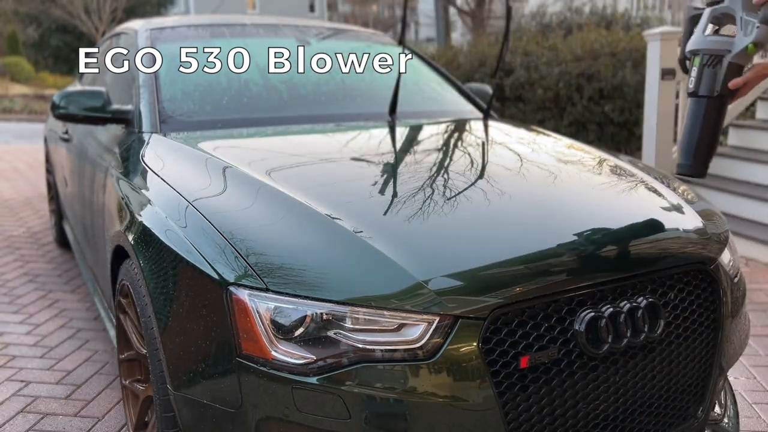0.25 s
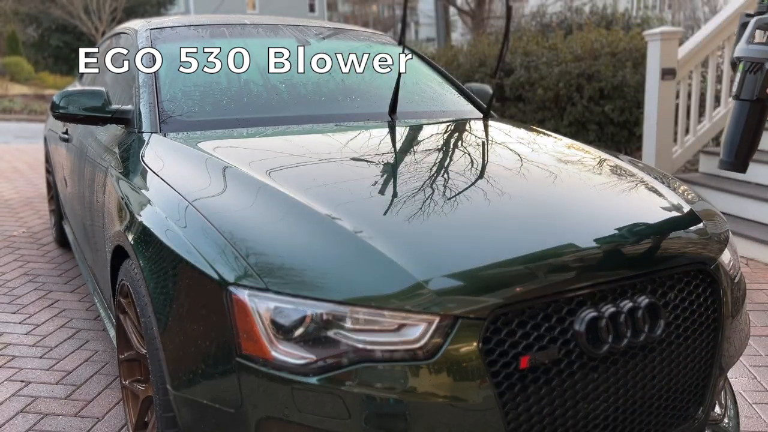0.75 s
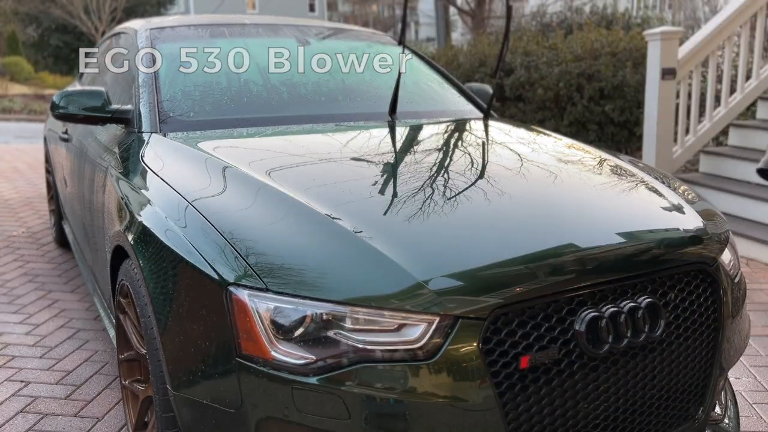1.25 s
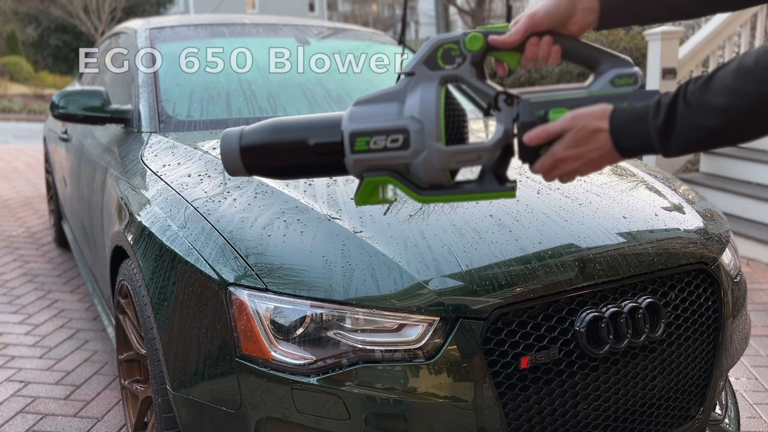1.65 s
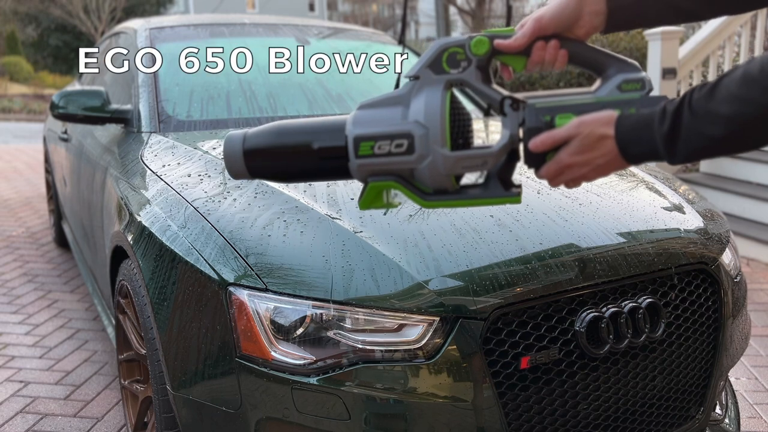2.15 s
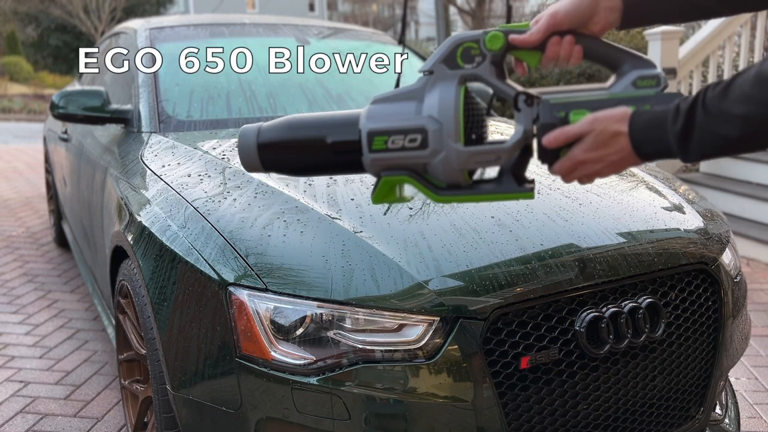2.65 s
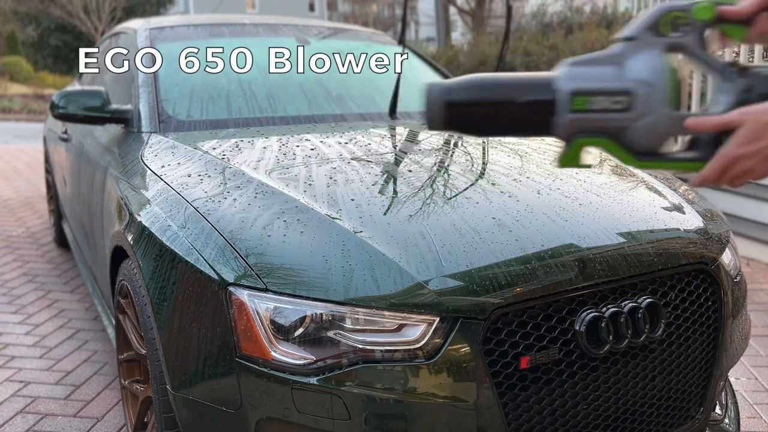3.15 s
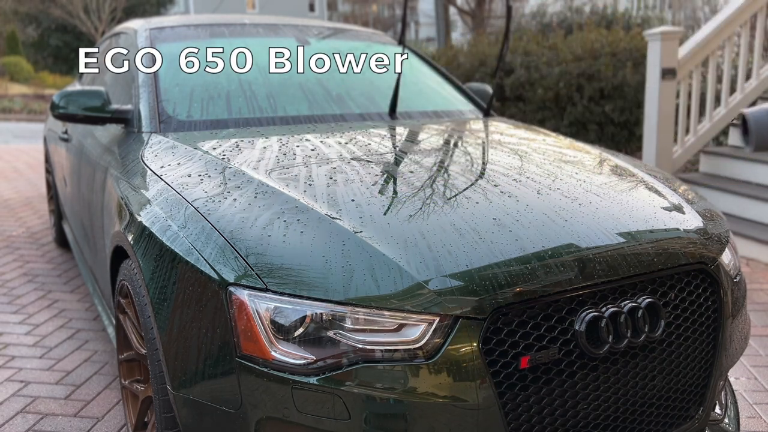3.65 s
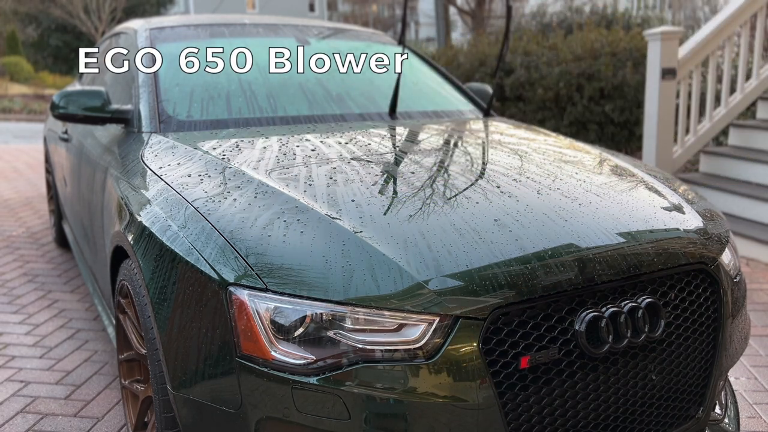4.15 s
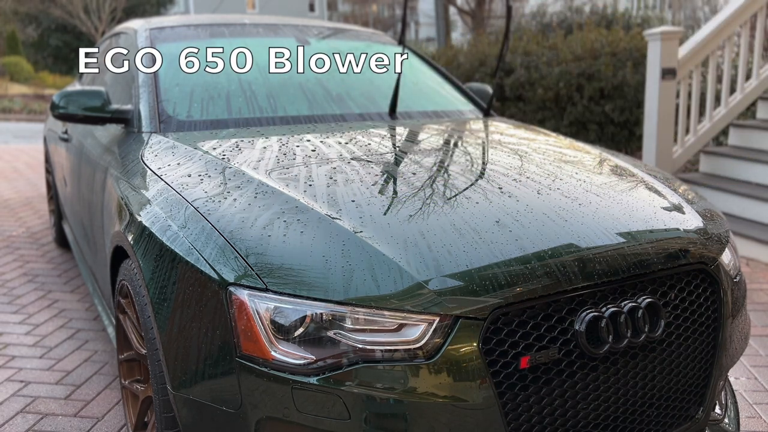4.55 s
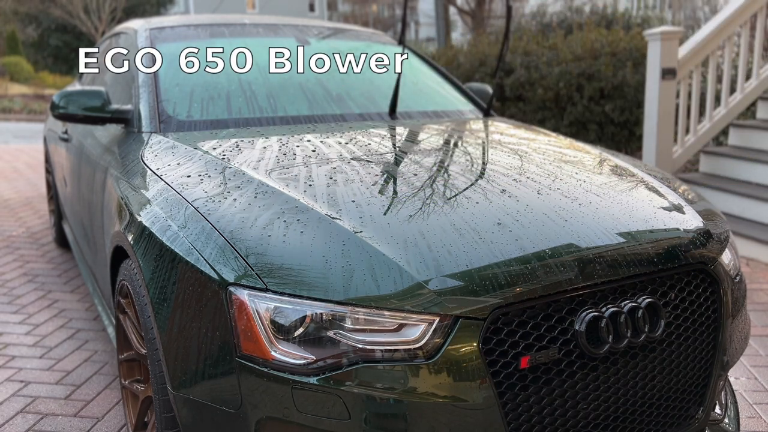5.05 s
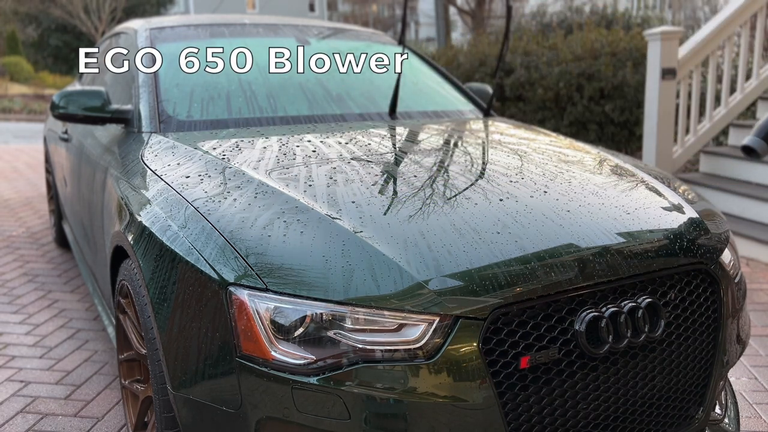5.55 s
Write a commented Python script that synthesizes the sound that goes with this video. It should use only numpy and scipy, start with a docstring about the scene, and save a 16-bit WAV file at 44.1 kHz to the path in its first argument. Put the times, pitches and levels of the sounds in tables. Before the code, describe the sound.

From the start, a battery leaf blower runs at full speed close to the microphone outdoors: a steady hiss of air, a fuzzy high whistle, a thin motor whine and low buffeting gusts. At about 1.2 seconds its pitch begins to fall, and at 1.5 seconds it cuts off abruptly. A near-silent lull follows, with only a very faint low wash of far traffic. Between about 3 and 4.8 seconds come a few tiny plastic clicks and soft sleeve rustles. Around 4 seconds a distant bird gives one faint rising call with a short echo. At about 4.9 seconds a second blower starts close by with a brief buzz and spins up quickly, its whine rising as the rush of air swells. By 5.5 seconds it reaches a higher pitch than the first, and it keeps blowing until the end, near 5.8 seconds.

```python
"""Two battery leaf blowers on a driveway, close to a stereo microphone. The first blows steadily and begins to
slow; its sound stops abruptly. The lull opens onto the yard: far traffic, faint handling nearby, one distant
rising bird call. Then the second starts with a buzz and spins up. Each blower is a hissing jet, low buffeting
at the nozzle, a fuzzy whistle from the fan's blade tips and thin motor lines, all following the shaft speed."""
import sys
import numpy as np
from scipy import signal
from scipy.fft import rfft, irfft
from scipy.io import wavfile
from scipy.ndimage import uniform_filter1d

SR = 44100
rng = np.random.default_rng(int(sys.argv[2]) if len(sys.argv) > 2 else 0)


def unload_wav(signal):
    """Save mono or channel-first audio to the path in sys.argv[1] as 16-bit WAV at rate SR, clipped to [-1, 1]."""
    wavfile.write(
        sys.argv[1],
        SR,
        np.round(np.clip(np.atleast_2d(signal).T, -1, 1) * 32767).astype(np.int16),
    )


N = 255780
T = np.arange(N) / SR
HZ = np.fft.rfftfreq(N, 1 / SR)

# Stereo image of the noise. Each row: frequency in Hz, left-right likeness 0-1, right lead in radians.
STEREO_IMAGE = [(60, 1, .02), (171, 1, 0.4), (359, .86, 0.98), (720, .55, 1.5), (1051, 0.7, 1.6),
                (1330, .72, 2.2), (1900, 0.6, 1), (2410, 0.2, 2.2), (3002, .12, 1.8), (3180, .18, 3),
                (3600, 0.4, 3.1), (4470, .25, 1.9), (5100, 0, 1.6), (5700, 0.3, 2.504), (6200, .05, 2.5),
                (6550, 0.1, .1), (7190, .45, .8), (8210, 0.8, 2.1), (9200, 0.7, 1.8), (10010, 1, 2.4),
                (11050, 0.7, 3.9), (12250, .72, 5.4), (13100, .9, 8.4), (14200, .88, 6.4),
                (15050, .38, 7.3), (15860, 0.7, 9)]
# Brief flares and a dip of the fan whistle. Each row: centre in seconds, gain in dB, length in seconds.
WHISTLE_FLARES = [(.07, 5.5, 0.005), (1.27, 3, 0.066), (1.365, 5.5, 0.0082), (5.19, 2, 0.019),
                  (5.28, 4.5, 0.053), (5.35, -4.5, 0.011), (5.395, 4, 0.01)]


def amp(db):
    """Decibels to gain."""
    return 10 ** (np.asarray(db) / 20)


def unit_rms(x):
    """Scales to rms 1."""
    return x / np.sqrt(np.mean(abs(x) ** 2) + 1e-30)


def read(points, hz):
    """Reads a spectrum on a log-frequency axis."""
    f, value = np.transpose(points)
    return np.interp(np.log(hz + 1), np.log(f + 1), value)


def curves(rows):
    """Each column of a time table, at every sample."""
    s, *columns = np.transpose(rows)
    return [np.interp(T, s, c) for c in columns]


def ramp(t0, t1):
    """0 before t0, rising evenly to 1 at t1."""
    return np.clip((T - t0) / (t1 - t0), 0, 1)


def between(t0, t1, edge_s):
    """1 from t0 to t1, with short ramps."""
    return ramp(t0, t0 + edge_s) * (1 - ramp(t1 - edge_s, t1))


def swell(s, length):
    """A bell curve of height 1 around second s; length is its standard deviation."""
    return np.exp(-.5 * ((T - s) / length) ** 2)


def swells(rows):
    """The dB that a table of brief swells adds."""
    return sum(db * swell(s, length) for s, db, length in rows)


def drift(rate_hz, channels=1):
    """Random wander of rms 1, up to about rate_hz."""
    white = rfft(rng.standard_normal((channels, N)))
    return unit_rms(irfft(white / (1 + (HZ / rate_hz) ** 4), N))


def phase(hz):
    """Running angle in radians of a steady or gliding pitch."""
    return 2 * np.pi * np.cumsum(hz * np.ones(N)) / SR


def stereo(a, b):
    """Two unrelated noises become a stereo pair: alike in the bass, out of step in the treble."""
    # Stereo balance. Each row: frequency in Hz, left over right in dB.
    balance = [(60, 2), (110, 0), (200, 1), (380, 0.5), (700, -2.0), (1290, -2.5), (2380, -2), (4400, 3),
               (8120, -1), (15000, 0.5)]
    hz, likeness, lead = np.transpose(STEREO_IMAGE)
    likeness = np.clip(read(np.c_[hz, likeness], HZ), 0, .999)
    lead = read(np.c_[hz, lead], HZ)
    left = rfft(a)
    right = (likeness * left + np.sqrt(1 - likeness ** 2) * rfft(b)) * np.exp(1j * lead)
    return np.array([left, right]) * amp(np.outer([.5, -.5], read(balance, HZ)))


def noise(spectrum):
    """Stereo noise of rms 1 with the given spectrum."""
    white = stereo(*rng.standard_normal((2, N)))
    return unit_rms(irfft(white * amp(read(spectrum, HZ)), N))


def air():
    """Plain stereo turbulence that excites the resonances."""
    return noise([(1, 0), (SR / 2, 0)])


def resonate(x, hz, width):
    """A steep resonance that follows the curve hz; the result has rms 1."""
    carrier = np.exp(1j * phase(hz))
    pole = np.exp(-np.pi * width * 1.5 / SR)
    return unit_rms((carrier * signal.lfilter([1], [1, -2 * pole, pole * pole], x / carrier)).real)


def shelf(x, side, edge_hz, db):
    """Lifts or lowers one side of the spectrum by a curve in dB."""
    part = signal.sosfiltfilt(signal.butter(3, edge_hz, side, fs=SR, output="sos"), x)
    return x + (amp(db) - 1) * part


def halvings(speed):
    """How many octaves the shaft runs below its top speed."""
    return np.log2(speed.max() / speed)


def levels(law, speed):
    """Each layer's dB at this shaft speed."""
    return {layer: db - slope_db * halvings(speed) for layer, (db, slope_db) in law.items()}


def patchy(x, depth_db):
    """The colour of a rush drifts in patches a few hundred Hz wide and about a tenth of a second long."""
    frames = signal.stft(x, nperseg=512)[2]
    patches = rng.standard_normal(frames.shape[1:])
    for _ in range(2):
        patches = uniform_filter1d(patches, size=5, axis=0)
        patches = uniform_filter1d(patches, size=13, axis=1)
    return signal.istft(frames * amp(depth_db * unit_rms(patches)))[1][:, :N]


def jet(spectrum, speed, dull_db, flutter_db):
    """Hiss of the air stream; its lower range shifts by dull_db per halving of the speed."""
    # Swells and dips of the top treble. Each row: centre in seconds, gain in dB, length in seconds.
    treble_swells = [(.87, -1.5, .07), (1.3, 1, 0.088), (4.96, 1, 0.026), (5.4, -2, 0.097)]
    hiss = noise(spectrum)
    low = signal.sosfilt(signal.butter(1, 1500, fs=SR, output="sos"), hiss)
    hiss += (amp(dull_db * halvings(speed)) - 1) * low
    hiss = shelf(hiss, "high", 10000, swells(treble_swells))
    return patchy(hiss, depth_db=1.1) * amp(flutter_db * drift(37))


def buffet(spectrum, rumble, flutter_hz):
    """Air buffets at the nozzle; the deepest part rises and falls as the nozzle swings round."""
    return amp(drift(flutter_hz)) * shelf(noise(spectrum), "low", 170, *curves(rumble))


def whistle(strands, moments, pitch, flutter_db, waver):
    """Neighbouring strands of blade-tip noise waver and beat against each other."""
    eddies, wander = air(), drift(18)[0]
    sound = 0
    for k, (multiple, width, *db) in enumerate(strands):
        shift = k * SR // 2  # each strand has its own eddies and wander
        hz = multiple * pitch * (1 + waver * np.roll(wander, shift))
        strand = resonate(np.roll(eddies, shift, axis=-1), hz, width)
        sound += amp(np.interp(T, moments, db)) * strand
    return sound * amp(flutter_db * drift(45) + swells(WHISTLE_FLARES))


def motor(orders, moments, speed, waver, fading):
    """Shaft lines flutter in the turbulent air and beam past the microphone as the blower turns."""
    angle = phase(speed * (1 + waver * drift(51)[0]))
    right_leads = np.array(STEREO_IMAGE)[:, ::2]
    sound = 0
    for order, *db in orders:
        lead = np.array([[0], [read(right_leads, order * speed.max())]])
        paths = unit_rms(1 + fading * (drift(27, channels=2) + 1j * drift(29, channels=2)))
        sound += amp(np.interp(T, moments, db)) * np.exp(1j * (order * angle + lead)) * paths
    return np.sqrt(2) * sound.real


def stator(pitch, ring_hz, width_hz):
    """A high motor line squeals briefly as it sweeps across the stator's resonance."""
    resonance = 1 / (1 + ((pitch - ring_hz) / width_hz) ** 8)
    return np.sqrt(2) * np.sin(phase(pitch)) * amp(3 * drift(60, channels=2)) * resonance


def first_blower():
    """Runs flat out while it is carried a little off the microphone, then slows; its sound stops abruptly."""
    # Each row: time in seconds, shaft speed in Hz.
    shaft = [(0, 370.5), (1.24, 370.5), (1.3, 352), (1.33, 338), (1.38, 318), (1.5, 280)]
    # Each layer: level at full speed in dB, dB lost per halving of the speed.
    law = {"jet": (-21, 13), "buffet": (-29, 21), "whistle": (-23.5, 6.7), "motor": (-17, 30)}
    # Spectra of the air stream. Each row: frequency in Hz, relative density in dB.
    jet_spectrum = [(20, -52.5), (250, -16), (600, 1), (800, 0.5), (1250, 2), (1900, 5.5), (2450, 0.5),
                    (3400, 0), (4100, -0.5), (4900, 1.5), (6200, 4.5), (7600, 0), (8900, 2.05), (10000, -9),
                    (11500, 2.5), (13000, -1.5), (15800, -5.5)]
    buffet_spectrum = [(20, -58), (45, -25.5), (72, -3.5), (100, -1), (135, -11), (195, 4), (225, -1.5),
                       (290, -3), (380, 3), (520, -3), (750, -16.5), (1500, -39.5)]
    # The deepest buffeting. Each row: time in seconds, gain in dB.
    rumble = [(0, -1.5), (1.5, 4)]
    # Moments in seconds as the blower turns past the microphone.
    moments = [0, .42, .8, 1.18, 1.36]
    # Blade-tip eddies. Each row: multiple of the swirl rate, width in Hz, gain in dB at each moment.
    strands = [(4.15, 93, -17, -18, -10, -13, -18.5), (5.87, 130, -17, -11.5, -22.5, -24.5, -14),
               (7.2, 110, -13.5, -15, -14.5, -11, -10), (7.6, 50, -5, -8.5, -11, -4, -9.5),
               (8.03, 50, -5.5, -6.5, -7.5, -7.5, -3), (8.42, 40, -3.5, -6.5, -3.5, -7.5, -7.5),
               (8.35, 770, -6, -5.5, -6, -5, -5.5)]
    # Motor and blade lines. Each row: multiple of the shaft speed, gain in dB at each moment.
    orders = [(1, -17, -16, -18, -17, -20), (3, -17, -20.5, -18.5, -18, -23),
              (6, -23, -16, -25, -25.5, -26), (9, -18, -24, -21, -19, -22),
              (12, -18, -22, -23.5, -16.5, -25), (18, -25, -21.5, -22.5, -29, -32)]
    speed, = curves(shaft)
    db, slowness = levels(law, speed), halvings(speed)
    out = amp(db["jet"]) * jet(jet_spectrum, speed, dull_db=-1.5, flutter_db=0.5)
    out += amp(db["buffet"]) * buffet(buffet_spectrum, rumble, flutter_hz=25)
    swirl = speed.max() * (speed / speed.max()) ** .9  # the swirling air slows less than the shaft
    fan = whistle(strands, moments, swirl, flutter_db=0.8 + 2 * slowness, waver=.006 + .022 * slowness)
    out += amp(db["whistle"]) * fan
    out += amp(db["motor"]) * motor(orders, moments, speed, waver=.0016, fading=0.6)
    out += amp(db["jet"] - 8.5) * stator(40 * speed, ring_hz=12900, width_hz=570)
    distance_db = -1.5 * ramp(0.51, 0.83)
    return out * amp(distance_db) * between(-1, 1.497, edge_s=0.024)


def bursts(rows):
    """Brief swells of noise, each ringing in its own band."""
    eddies = air()
    return sum(amp(db) * swell(s, length) * resonate(eddies, hz, width)
               for s, db, length, hz, width in rows)


def gusts():
    """Gusts of the air stream boom at the nozzle; the fan whistle and motor whine flare briefly."""
    # Each row: centre in seconds, level in dB, length in seconds, pitch in Hz, width in Hz.
    booms = [(.025, -29.5, 0.026, 300, 130), (.65, -31, 0.026, 200, 49.73), (.81, -36.5, 0.02, 85, 22),
             (.84, -25.5, .04, 248, 55.1), (.855, -25, 0.029, 345, 110), (1.31, -37, 0.028, 91, 39.97),
             (5.2, -38, 0.042, 256, 250), (5.41, -31.5, 0.043, 165, 150)]
    brief_whines = [(1.473, -36, 0.0086, 1730, 90), (5.008, -41, .03, 1280, 50),
                    (5.19, -37.5, 0.018, 1260, 80), (5.44, -32, 0.018, 5050, 150)]
    return bursts(booms + brief_whines)


def traffic():
    """Far traffic and open air, a low wash under everything."""
    # Each row: frequency in Hz, relative density in dB.
    spectrum = [(12, -69), (20, -33), (37, -10), (59, -1), (215, -16.5), (241, -8.5), (263, -18.5),
                (421, -21), (457, -19.5), (1270, -39.5), (1830, -43.5), (7510, -54.5), (10200, -59),
                (12700, -51.5), (15000, -56.5)]
    return amp(-60.5 + 0.87 * drift(9.16) + .6 * drift(1.9)) * noise(spectrum)


def far_tones():
    """Faint, blurred tones from far off in the lull."""
    # Each row: centre in seconds, level in dB, length in seconds, pitch in Hz, width in Hz.
    tones = [(1.64, -66.5, 0.075, 431, 30.2), (1.84, -87, 0.04, 1820, 70), (2.8, -94, 0.04, 3880, 40),
             (2.8, -69, .035, 432, 35), (3.309, -84, 0.02, 1854, 79.8)]
    return bursts(tones)


def handling():
    """Near the microphone the plastic grip clicks and sleeves rustle as a blower is moved."""
    # Each row: start in seconds, level in dB, decay in seconds.
    grip_clicks = [(2.943, -68, .004), (3.138, -73, .004), (4.707, -65, 0.003)]
    # Each row: centre in seconds, level in dB, length in seconds.
    sleeve_rustles = [(3.136, -76, 0.012), (3.42, -77.5, 0.075), (3.621, -77, 0.068), (4.035, -77.5, 0.094),
                      (4.83, -74, 0.051)]
    # The colour of both. Each row: frequency in Hz, relative density in dB.
    spectrum = [(200, -4), (1500, 3.5), (3000, -7), (5500, -7.5), (8000, -8), (13000, -4), (16000, -14)]
    sleeves = sum(amp(db) * swell(s, length) for s, db, length in sleeve_rustles) * amp(2.8 * drift(70))
    clicks = sum(amp(db) * (T >= s) * np.exp(-abs(T - s) / decay) for s, db, decay in grip_clicks)
    return (sleeves + clicks) * noise(spectrum)


def echo(x, t60):
    """Houses and trees scatter a far sound into a dying tail."""
    tail = rng.standard_normal((2, SR)) * amp(-60 * T[:SR] / t60)
    return signal.fftconvolve(x, tail / np.linalg.norm(tail[0]), axes=1)[:, :N]


def bird():
    """One distant upward slur, heard mostly through its echo; its top note lingers as a thin ring."""
    # Each row: time in seconds, pitch in Hz, level in dB going into the echo.
    slur = [(3.88, 2000, -105), (3.94, 2240, -79.5), (3.99, 2660, -72), (4.025, 2990, -59),
            (4.06, 3270, -55), (4.14, 3950, -54.5), (4.19, 4290, -60), (4.25, 4450, -72.5),
            (4.3, 4360, -86.5), (4.36, 4300, -130)]
    # Hoarseness that clears as the call rises. Each row: time in seconds, pitch scatter in Hz.
    scatter = [(3.95, 150), (4.04, 250), (4.14, 141), (4.22, 80)]
    hz, db = curves(slur)
    hoarse_hz = hz + curves(scatter)[0] * drift(430)[0]
    call = amp(db) * between(slur[0][0], slur[-1][0], edge_s=.01) * np.sin(phase(hoarse_hz))
    ring_s, ring_t60_s = 4.19, 0.73
    ring_level = amp(-63.5 - 60 * abs(T - ring_s) / ring_t60_s) * ramp(ring_s - .03, ring_s)
    ring = ring_level * resonate(air(), hz=4200, width=14)
    return 0.4 * call + echo(call[None], t60=0.77) + ring


def trigger():
    """A bright tick as the second blower is switched on."""
    return amp(-49) * swell(4.884, 0.0048) * resonate(air(), hz=12600, width=670)


def start_buzz():
    """The motor hums and shakes the housing until it catches."""
    # Resonances of the housing. Each row: frequency in Hz, width in Hz, gain in dB.
    housing = [(411, 54, -5.5), (810, 88, -9), (1210, 140, -10.5), (1537, 77, -1.5), (2270, 190, -6.5),
               (3230, 340, -7.5), (6400, 35, -16), (12300, 550, -13)]
    catch_s, fall_db_per_s, hum_hz = 5.0, 194, 435
    shake = air()
    rattle = sum(amp(db) * resonate(shake, hz, width) for hz, width, db in housing)
    linger_db = fall_db_per_s * np.clip(T - catch_s, 0, .025)  # the hum outlasts the rattle
    hum = amp(-2.5 + linger_db) * np.sin(phase(hum_hz * (1 + .02 * drift(62)[0])))
    return amp(-44 - fall_db_per_s * np.maximum(T - catch_s, 0)) * (hum + rattle)


def switching(hz):
    """The speed controller's thin tone swells at half throttle."""
    tone = amp(-34.5 + 1.4 * drift(12)) * swell(5.22, 0.14) * np.sin(2 * np.pi * hz * T)
    return tone * [[1], [-1]]  # left and right are half a wave apart


def second_blower():
    """Close by, it buzzes for a moment, then spins up to a higher top speed than the first."""
    # Each row: time in seconds, shaft speed in Hz.
    shaft = [(4.87, 130), (5, 156), (5.04, 190), (5.08, 227), (5.12, 257), (5.16, 297), (5.2, 318),
             (5.25, 345), (5.3, 361), (5.35, 382), (5.41, 415), (5.45, 428), (5.49, 444.5)]
    # Each layer: level at full speed in dB, dB lost per halving of the speed.
    law = {"jet": (-20.5, 13.24), "buffet": (-30.5, 13.2), "whistle": (-26.5, 4), "motor": (-26.5, 13.4)}
    # Spectra of the air stream. Each row: frequency in Hz, relative density in dB.
    jet_spectrum = [(20, -50), (250, -30), (600, -2.5), (1000, 1), (1600, 2), (2100, 3.5), (2600, 4),
                    (4300, 2.5), (5600, 3.5), (6700, 4), (7450, 2), (8300, 6), (8900, 5.5), (9800, -10),
                    (11600, 8.5), (13000, 4.5), (15800, -1)]
    buffet_spectrum = [(20, -40), (45, -38), (75, 0), (110, 2.5), (160, -6.5), (230, -5.5), (310, 0),
                       (370, -8), (480, -1.5), (650, -18.5), (1500, -24)]
    # The deepest buffeting. Each row: time in seconds, gain in dB.
    rumble = [(5.1, 0.5), (5.2, 1), (5.4, 2), (5.6, -7), (5.75, -2)]
    # Moments in seconds as the blower turns past the microphone.
    moments = [5.12, 5.4, 5.6, 5.802]
    # Blade-tip eddies. Each row: multiple of the swirl rate, width in Hz, gain in dB at each moment.
    strands = [(4.76, 130, -22, -25, -8.5, -10), (8.1, 52, -19, -16, -15, -14), (7.4, 57, -17, -9, -7, -5),
               (8.03, 68, -4, -3.5, -7, -4), (8.62, 70, -25, -15, -6, -3.5), (7.83, 320, -5, -6.5, -7, -7)]
    # Motor and blade lines. Each row: multiple of the shaft speed, gain in dB at each moment.
    orders = [(1, -16, -9.5, -6, -20), (12, -19, -9, -10, -5)]
    start_s, switching_hz = 4.876, 10085
    speed, = curves(shaft)
    db = levels(law, speed)
    out = amp(db["jet"]) * jet(jet_spectrum, speed, dull_db=8.5, flutter_db=0.36)
    out += amp(db["buffet"]) * buffet(buffet_spectrum, rumble, flutter_hz=35)
    swirl = speed * (1 + 0.06 * np.maximum(T - 5.47, 0))  # at top speed the whistle keeps creeping up
    fan = whistle(strands, moments, swirl, flutter_db=1.8, waver=.0029 + .022 * halvings(speed))
    out += amp(db["whistle"]) * fan * ramp(4.77, 5.1) ** 2
    out += amp(db["motor"]) * motor(orders, moments, speed, waver=0.0006, fading=0.25)
    out += amp(db["motor"] - 13) * resonate(air(), speed, width=70)  # air churned once a turn
    out += amp(db["jet"] - 4.5) * stator(40 * speed, ring_hz=13400, width_hz=390)
    sideband = switching_hz + 10.3 * speed
    out += amp(db["jet"] - 10) * stator(sideband, ring_hz=12930, width_hz=210)
    out *= amp(-11.5 * (1 - ramp(start_s, start_s + 0.24)))  # the air needs a moment to get moving
    out += trigger() + start_buzz() + switching(switching_hz)
    return out * between(start_s, 9, edge_s=0.014)


def scene():
    """Both blowers with their gusts up front, the quiet yard behind."""
    blowers = first_blower() + second_blower() + gusts()
    return blowers + traffic() + handling() + bird() + far_tones()


def record(dry):
    """The microphone's low cut and the recorder's band limit."""
    low_cut_hz, band_limit_hz = 43, 15750
    cut = signal.sosfilt(signal.butter(4, low_cut_hz, "high", fs=SR, output="sos"), dry)
    band_limit = signal.firwin(767, band_limit_hz, window=("kaiser", 9), fs=SR)
    return signal.oaconvolve(cut, band_limit[None], "same")


dry = scene()
out = record(dry)
unload_wav(out)
```